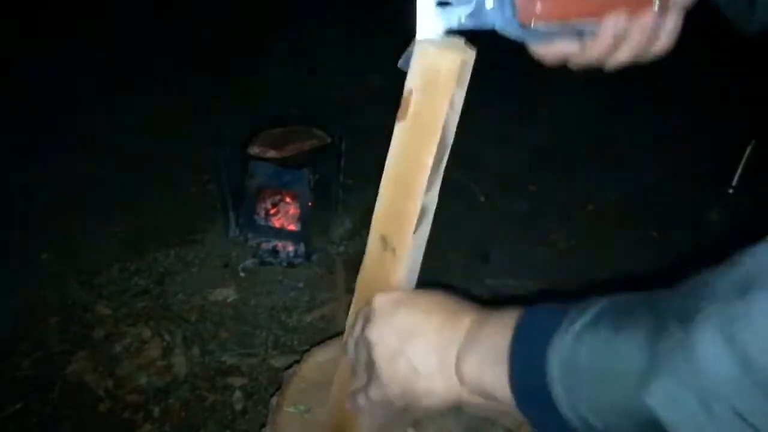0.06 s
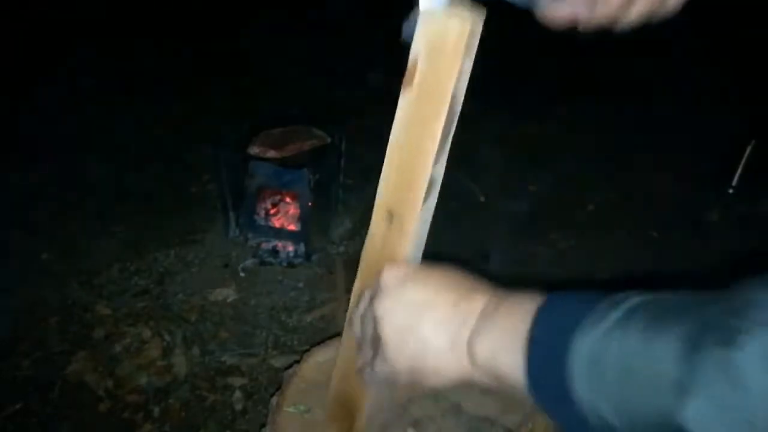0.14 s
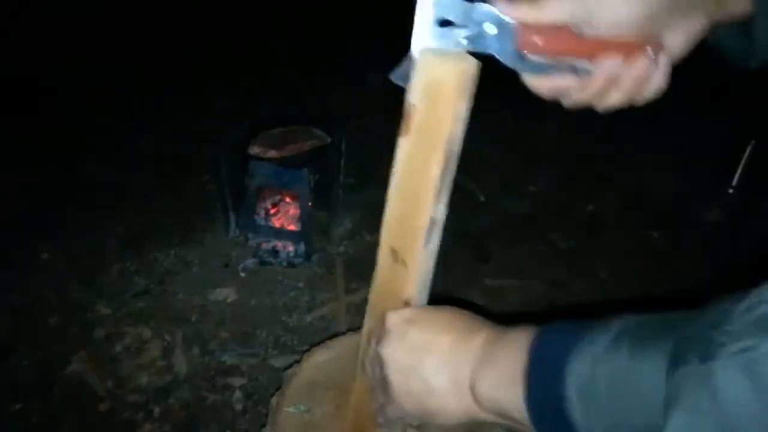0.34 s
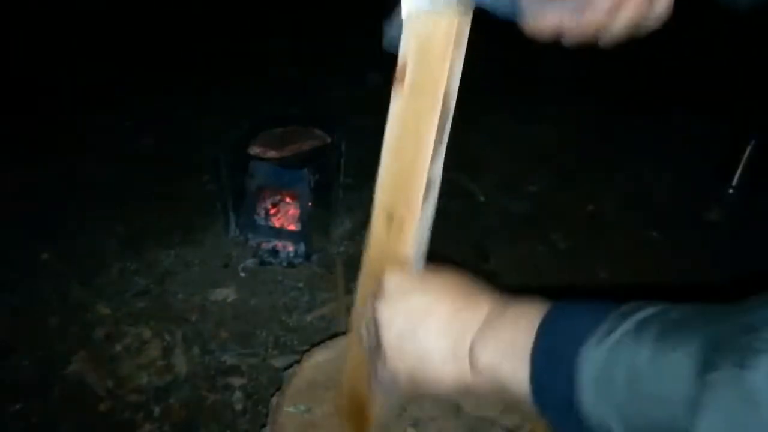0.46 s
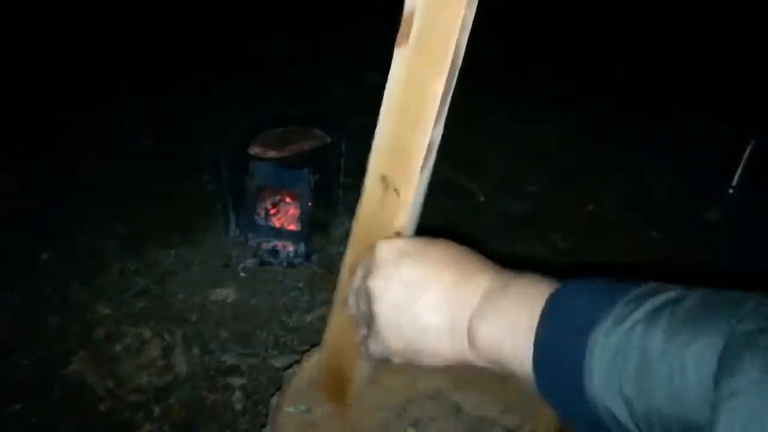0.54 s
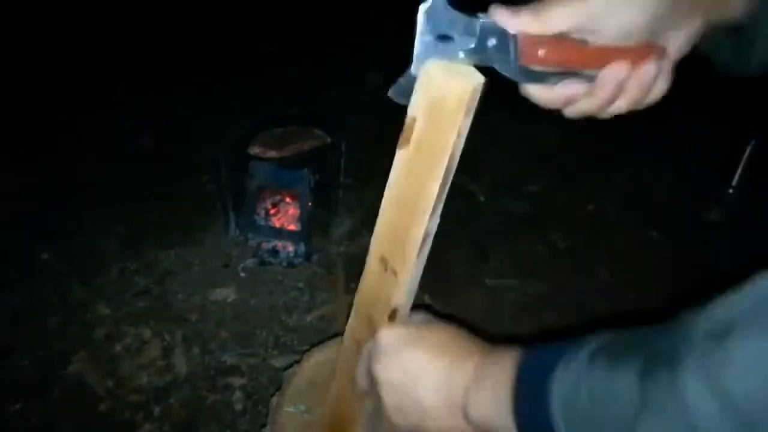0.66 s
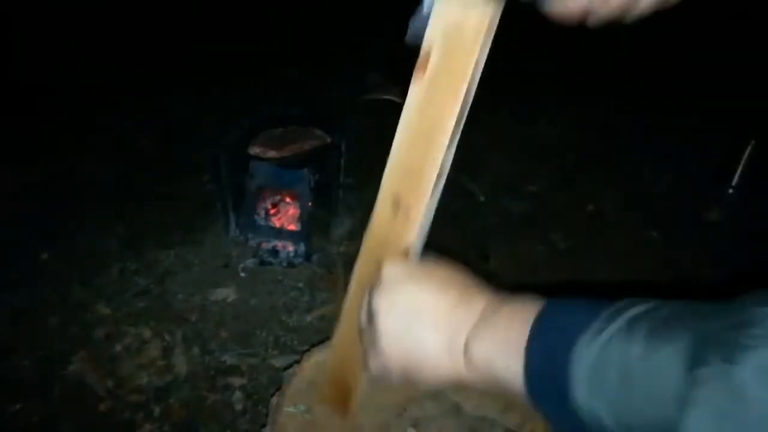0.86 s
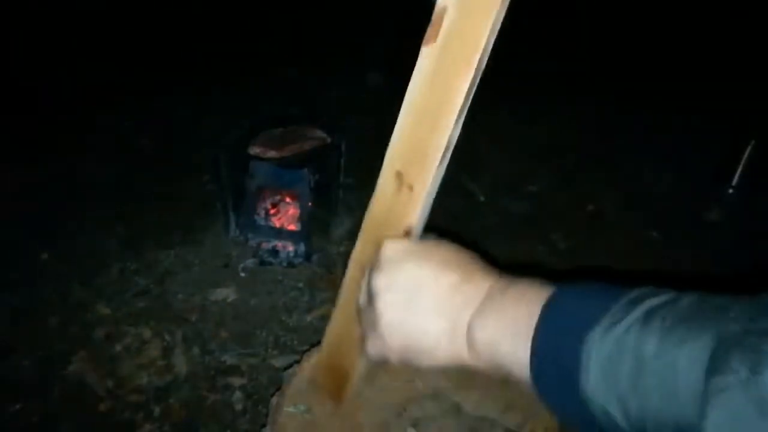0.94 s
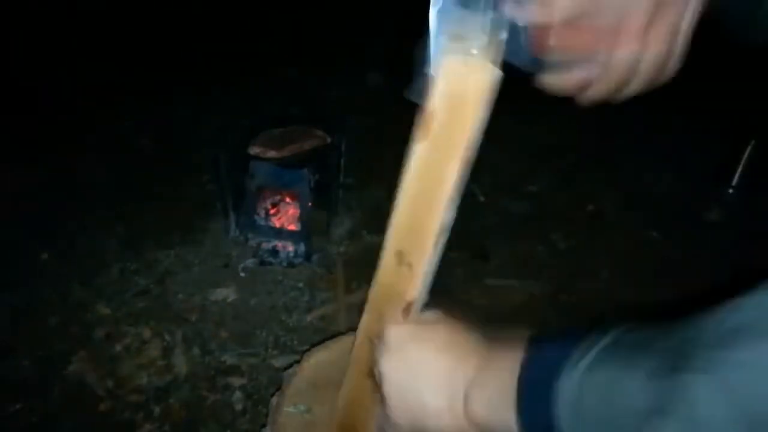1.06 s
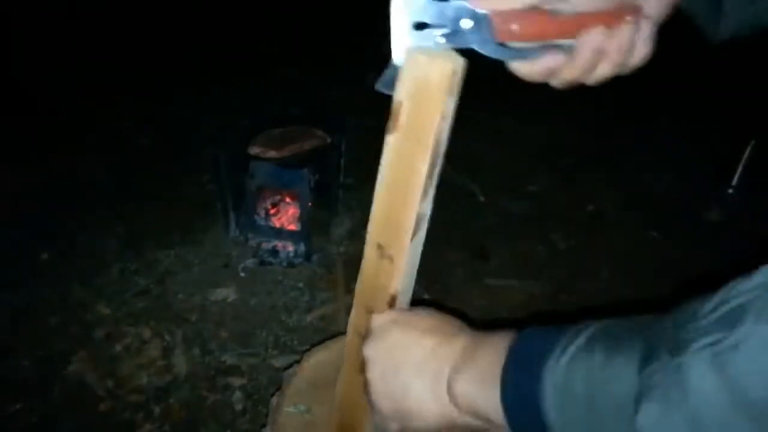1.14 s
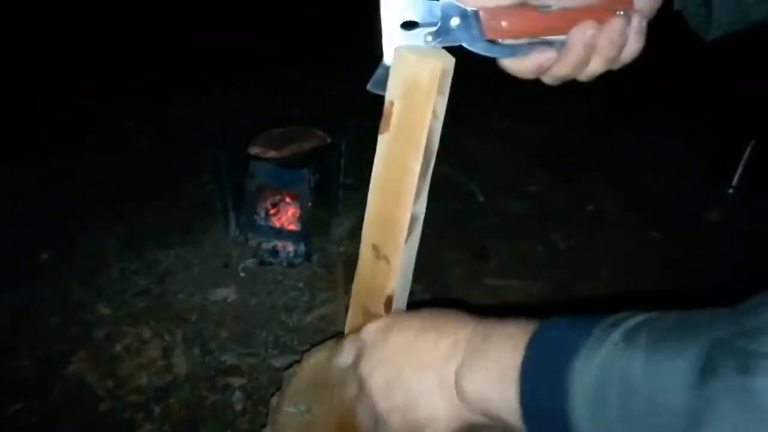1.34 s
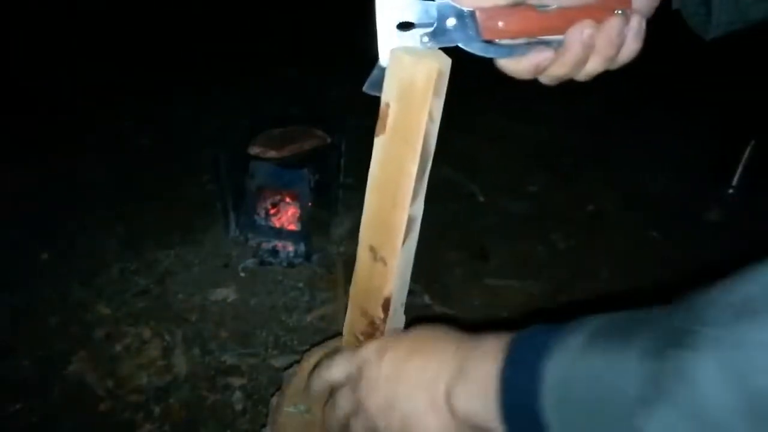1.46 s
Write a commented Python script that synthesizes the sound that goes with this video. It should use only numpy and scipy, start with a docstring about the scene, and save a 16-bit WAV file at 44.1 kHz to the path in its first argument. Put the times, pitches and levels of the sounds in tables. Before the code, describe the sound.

Three hard wooden knocks outdoors as a stick with a hatchet in it hits a stump.

```python
"""Outdoors among trees at night, a hatchet stuck in a stick of firewood is knocked on a stump three times.
Each knock is a graze, then an impact: fibres crunch, the modes of wood and steel ring, the stump thuds,
and the stick rebounds. The blows overload the nearby microphone, and ground and trees reflect them.
The echo of an earlier knock is dying at the start, the wood ticks as it is lifted,
and moving air rumbles on the microphone."""
import sys
import numpy as np
from scipy import signal
from scipy.fft import rfft, irfft
from scipy.io import wavfile

SR = 44100
rng = np.random.default_rng(int(sys.argv[2]) if len(sys.argv) > 2 else 0)


def generate_wav(signal):
    """Clip the signal to [-1, 1] and save it as 16-bit WAV at the path in sys.argv[1]."""
    frames = np.transpose(np.atleast_2d(signal))
    scaled = np.clip(frames, -1, 1) * 32767
    pcm = np.round(scaled).astype(np.int16)
    wavfile.write(sys.argv[1], SR, pcm)


N = 66150


def amp(db):
    """Amplitude ratio: tenfold for every 20 dB."""
    return 10 ** (np.asarray(db) / 20)


def fade(t, t60):
    """Exponential damping: 60 dB down t60 seconds after t = 0."""
    return np.exp(-np.log(1000) * np.maximum(t, 0) / t60)


def read(points, hz, column=1):
    """Linear interpolation of a table column over log frequency."""
    table = np.transpose(points)
    return np.interp(np.log(hz + 1), np.log(table[0] + 1), table[column])


def add(mix, s, sound):
    """Superposition: a sound joins the mix at s seconds, which may lie before the start."""
    at = round(s * SR)
    sound = sound[:, max(-at, 0):]
    part = mix[:, max(at, 0):][:, :sound.shape[1]]
    part += sound[:, :part.shape[1]]


def tilted(x, db_per_octave):
    """Spectral tilt between 800 and 6000 Hz, pivoting at 1600 Hz."""
    size = x.shape[1]
    octaves = np.log2(np.clip(np.fft.rfftfreq(2 * size, 1 / SR), 800, 6000) / 1600)
    return irfft(rfft(x, 2 * size) * amp(db_per_octave * octaves))[:, :size]


def low_pass(x, hz):
    """Steep band limiting by a windowed sinc."""
    kernel = signal.firwin(401, hz, window=("kaiser", 8), fs=SR)
    return signal.oaconvolve(x, kernel[None], "same")


# Stereo balance. Each row: frequency in Hz, left minus right in dB.
BALANCE = [(100, 0), (350, -1.5), (1200, 0.6065), (2200, -2), (5000, 0.5), (9000, -7)]

def sides(hz):
    """Level difference between the microphone's left and right ports, as two gains."""
    return amp(np.array([[.5], [-.5]]) * read(BALANCE, hz))


# Likeness of left and right. Each row: frequency in Hz, correlation from 0 to 1.
CORRELATION = [(50, .92), (130, 0.5), (300, 0.5), (600, 0.8), (1200, 0.5), (2200, .25), (5000, 0.4),
               (9000, 0.9)]

def noise(spectrum, size):
    """Partial coherence: coloured stereo noise of rms 1 whose sides share a random component."""
    hz = np.fft.rfftfreq(size, 1 / SR)
    left, independent = np.exp(2j * np.pi * rng.random((2, len(hz))))
    shared = read(CORRELATION, hz)
    right = shared * left + np.sqrt(1 - shared ** 2) * independent
    x = irfft(np.array([left, right]) * amp(read(spectrum, hz)) * sides(hz), size)
    return x / x.std()


# Course of the hiss. Each row: time in seconds, level in dB.
HISS_ENVELOPE = [(0, -66), (.5, -72), (.85, -81), (1.2, -75), (1.5, -79)]
# Colour of the hiss. Each row: frequency in Hz, relative spectral density in dB.
HISS_SPECTRUM = [(100, 0.5), (600, -3), (2000, -5.5), (8500, -12)]

def hiss(t):
    """Noise floor: a faint broadband hiss whose level drifts."""
    return amp(np.interp(t, *np.transpose(HISS_ENVELOPE))) * noise(HISS_SPECTRUM, len(t))


# Course of the rumble. Each row: time in seconds, deep band level in dB, upper band level in dB.
RUMBLE_ENVELOPE = [(0, -50.5, -69), (.16, -52, -65), (0.322, -57.5, -66.5), (0.389, -42.5, -59.5),
                   (.54, -53.5, -66), (.7, -51.5, -65), (.83, -51.5, -64), (.9, -47.5, -51),
                   (.96, -47.5, -56), (1.08, -40.5, -44), (1.18, -52, -56), (1.24, -44, -62),
                   (1.41, -45.5, -63.5), (1.5, -52.5, -71)]
# Colours of the two bands. Each row: frequency in Hz, relative spectral density in dB.
DEEP_SPECTRUM = [(10, -9), (28, -1), (55, -0.5), (85, -6.5), (130, -17), (250, -43.5), (600, -81)]
UPPER_SPECTRUM = [(30, -21.5), (80, -8), (115, -2.5), (170, -7.5), (250, -16.5), (400, -35.5), (900, -58.5)]

def air_rumble(t):
    """Turbulence: moving air makes slow random pressure changes on the microphone."""
    s, deep_db, upper_db = np.transpose(RUMBLE_ENVELOPE)
    deep = amp(np.interp(t, s, deep_db)) * noise(DEEP_SPECTRUM, len(t))
    upper = amp(np.interp(t, s, upper_db)) * noise(UPPER_SPECTRUM, len(t))
    return deep + upper


# Puffs of air. Each row: centre time in seconds, level in dB, spectral peak in Hz.
AIR_PUFFS = [(0.167, -41, 52.5), (.431, -41, 54.18), (.899, -31, 63.15), (1.0, -33, 70.2),
             (1.068, -35, 83.27), (1.107, -31.5, 76.5), (1.177, -32, 85.49), (1.402, -36, 55)]
PUFF_CENTRE_S = .05

def puff(db, hz):
    """Pressure pulse: air buffets the microphone with one slow swing, a Ricker wavelet."""
    u = (np.arange(SR // 10) / SR - PUFF_CENTRE_S) * np.pi * hz
    return amp(db) * (2 * u ** 2 - 1) * np.exp(-u ** 2) * sides(hz)


def echo(x, bands, rise_s=.024):
    """Diffuse reflection: convolution with a noise tail, each band dying at its own rate."""
    white = noise([(1, 0), (SR, 0)], SR)
    hz, t, spectra = signal.stft(white, SR, nperseg=256)
    t60 = read(bands, hz, column=2)[:, None]
    unit_energy = np.sqrt(2 * np.log(1000) / (t60 * SR))
    spectra = spectra * amp(read(bands, hz))[:, None] * fade(t, t60) * unit_energy
    tail = signal.istft(spectra, SR, nperseg=256)[1]
    build_up = np.minimum(np.arange(tail.shape[1]) / SR / rise_s, 1) ** 2
    return signal.fftconvolve(x, tail * build_up, axes=1)[:, :x.shape[1]]


# Echoes from the ground nearby, the trees around and the far edge of the wood.
# Each row: frequency in Hz, gain in dB, 60 dB decay time in seconds.
GROUND_SCATTER = [(100, -17.5, .15), (300, -20.5, 0.36), (498.6, -18.5, 0.27), (850.6, -13, 0.19),
                  (1279.5, -24, 0.11), (2200, -17.5, 0.15), (5080, -13.5, 0.098), (9020, -15, .12)]
TREE_ECHO = [(100, -30, .4), (451.3, -37, 0.56), (852.7, -28, 0.2), (1198.4, -34, 0.36), (2200, -28, 0.45),
             (3719, -32.5, .52), (4940, -29, .5), (9000, -31, .44)]
FAR_ECHO = [(100, -68.5, .4), (500, -57.5, .5), (1200, -57, .55), (2500, -58.5, .55), (4206, -54.5, .55),
            (9000, -51.5, .5)]

def surroundings(x, far_delay_s=.28):
    """Propagation delay: ground and trees answer first, the far edge of the wood later."""
    echoes = echo(x, GROUND_SCATTER) + echo(x, TREE_ECHO)
    add(echoes, far_delay_s, echo(x, FAR_ECHO))
    return echoes


# Ticks of the lifted wood. Each row: start in seconds, level in dB.
LIFT_TICKS = [(.4918, -44), (1.468, -58)]
# Colour of a tick. Each row: frequency in Hz, relative spectral density in dB.
TICK_SPECTRUM = [(200, -20), (1200, -15.5), (2400, -9), (3800, 1.5), (6000, -6.5), (9000, -6)]

def tick(db):
    """Broadband transient: a small snap in the wood, scattered by the ground."""
    t = np.arange(SR // 4) / SR
    snap = amp(db) * fade(t, t60=.014) * noise(TICK_SPECTRUM, len(t))
    return snap + echo(snap, GROUND_SCATTER)


def ring(modes, t, pitch, length, contact_s=.002):
    """Normal modes: sines hold during contact, then decay; pitch scales frequency, length decay time."""
    out = np.zeros((2, len(t)))
    for k, (hz, db, t60) in enumerate(modes):
        port_lag = np.array([[0], [1.3]]) * np.tanh((hz / 2000) ** 2)  # radians; the right port trails
        envelope = amp(db) * fade(t - contact_s, t60 * length)
        polarity = (-1) ** k  # neighbouring modes swing in opposite directions
        out += polarity * sides(hz) * envelope * np.sin(2 * np.pi * hz * pitch * t - port_lag)
    return out


# Modes of the blade. Each row: base frequency in Hz, relative level in dB, base decay time in seconds.
STEEL_MODES = [(2085, -55, 0.39), (3558, -48.5, .4), (4830, -51.5, 0.41), (4777.7, -54, 0.56)]

def steel_ring(t):
    """Light damping: the steel rings on faintly after the wood."""
    return ring(STEEL_MODES, t, pitch=.99784, length=.64)


# Modes of the wood. Each row: base frequency in Hz, relative level in dB, base decay time in seconds.
WOOD_MODES = [(295, -22.5, 0.044), (391.56, -20, .02), (617.3, -21.5, 0.032), (799.9, -22, .065),
              (1002, -17, .022), (1204.8, 0.5, 0.024), (1462.9, -11.5, .021), (1741, -4.5, .019),
              (2064.6, -13, .028), (2201.8, -11.5, 0.029), (2795.6, -15.5, .02), (3463.5, -5, 0.02),
              (4966.5, -9, 0.024), (8899.5, -26, .028)]

def wood_ring(t, pitch, length):
    """Coupled vibration: stick, stump and blade ring together and damp quickly."""
    return ring(WOOD_MODES, t, pitch, length)


# Colour of the fibres' crunch. Each row: frequency in Hz, relative spectral density in dB.
FIBRE_SPECTRUM = [(60, -32.5), (190, -27), (310, -8), (500, -8.5), (750, -9), (1000, -4), (1400, -1),
                  (2100, -2), (2800, -13.5), (3550, -6), (4200, -7.5), (5050, -5.5), (6500, -14),
                  (9000, -22)]
GRAZE_LEAD_S, IMPACT_RISE_S = .0045, .00039

def crunch(t, length=1):
    """Impact noise: crushed fibres give a damped burst; length scales its decay time."""
    return fade(t, t60=.024 * length) * noise(FIBRE_SPECTRUM, len(t))


def graze(t):
    """Contact noise: a dull swell as the stick brushes the stump just before landing at t = 0."""
    swell = np.clip(1 + t / GRAZE_LEAD_S, 0, 1) ** .5
    return amp(-20) * swell * tilted(noise(FIBRE_SPECTRUM, len(t)), db_per_octave=-3.5)


# Chatter of the stick after landing. Each row: start in seconds, gain in dB, pitch factor.
STICK_REBOUNDS = [(.2338, -27, 1.0), (.6005, -22.5, 1.0), (.6095, -22, 1.1), (1.002, -30, .97)]

def rebound(db, pitch):
    """Elastic rebound: a light further contact excites the same modes, brighter than the blow."""
    t = np.arange(SR // 4) / SR
    onset = np.minimum(t / IMPACT_RISE_S, 1)
    crack = amp(-9.5) * crunch(t)
    rings = amp(-7.5) * tilted(wood_ring(t, pitch, length=.9856), db_per_octave=3.5)
    return amp(db) * onset * (crack + rings)


# Knocks on the stump; the first lands before the start. Each row: landing in seconds, gain in dB,
# tilt in dB per octave, decay time factor, wood pitch factor, then crunch, thud and echo offsets in dB.
HATCHET_KNOCKS = [(-.17, -2, -3.5, 1.0, 1.0, 4, 0, 4.5), (0.2113, 0.5, -2.0655, .95, 0.99941, -1.5, -4, 1),
                  (0.5861, 0.5, 0.2963, 0.9978, 1.0, -0.5, 7, -1.5),
                  (0.9797, -4, -.5, .6, 0.99418, 2, 2, -1.5)]

def knock(db, tilt_db, length, pitch, crack_db, thud_db, echo_db):
    """Impulse excitation: after a graze, the blow crushes fibres and shakes wood, steel and stump."""
    t = np.arange(SR) / SR - GRAZE_LEAD_S
    landed = np.clip(t / IMPACT_RISE_S, 0, 1)
    touch = (1 - landed) * graze(t)
    crack = amp(crack_db - 3) * landed * crunch(t - .0038, length)  # holds briefly before decaying
    thud = amp(thud_db - 35) * landed * fade(t, t60=.12) * np.sin(2 * np.pi * 88 * t)
    rings = landed * (wood_ring(t, pitch, length) + steel_ring(t))
    direct = tilted(touch + crack + thud + rings, tilt_db)
    radiated = amp(echo_db) * (crack + amp(-3) * rings)
    return amp(db) * (direct + surroundings(radiated))


def scene():
    """Superposition of night air, knocks, rebounds and ticks."""
    t = np.arange(N) / SR
    mix = air_rumble(t) + hiss(t)
    for s, db, hz in AIR_PUFFS:
        add(mix, s - PUFF_CENTRE_S, puff(db, hz))
    for s, *blow in HATCHET_KNOCKS:
        add(mix, s - GRAZE_LEAD_S, knock(*blow))
    for s, db, pitch in STICK_REBOUNDS:
        add(mix, s, rebound(db, pitch))
    for s, db in LIFT_TICKS:
        add(mix, s, tick(db))
    return mix


def record(dry):
    """Nonlinear distortion: the microphone saturates, the band narrows, and peaks clip at full scale."""
    saturated = dry / (1 + dry ** 4) ** (1 / 4)
    narrowed = low_pass(saturated, hz=9050)
    clipped = np.clip(amp(.9369) * narrowed, -1, 1)
    return low_pass(clipped, hz=17000)


dry = scene()
out = record(dry)
generate_wav(out)
```